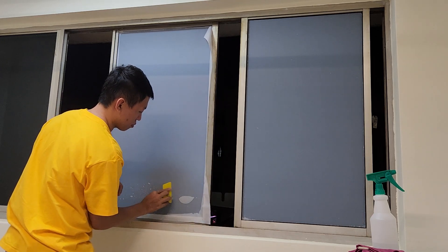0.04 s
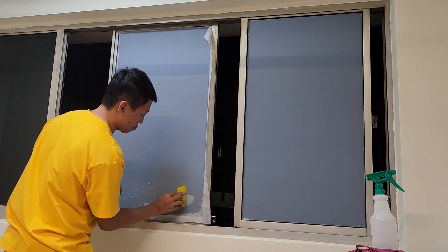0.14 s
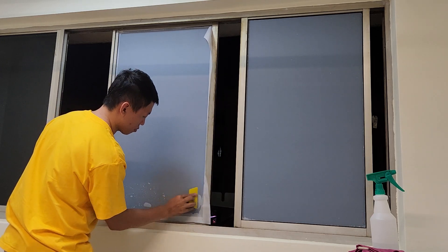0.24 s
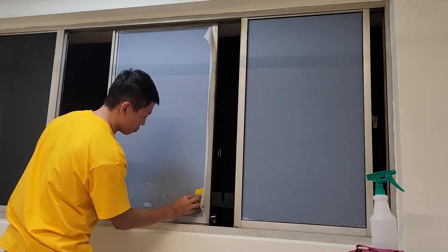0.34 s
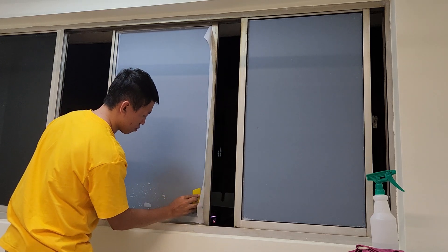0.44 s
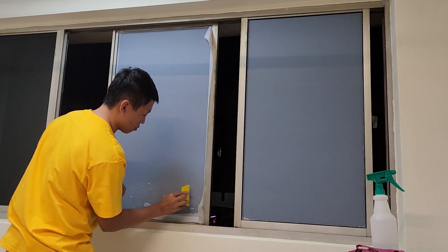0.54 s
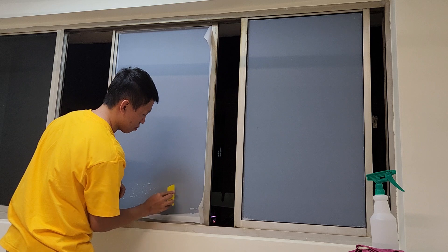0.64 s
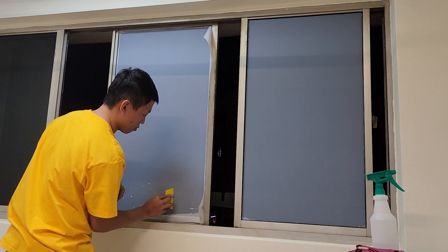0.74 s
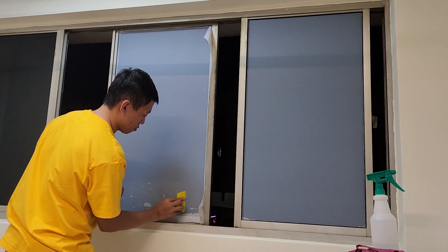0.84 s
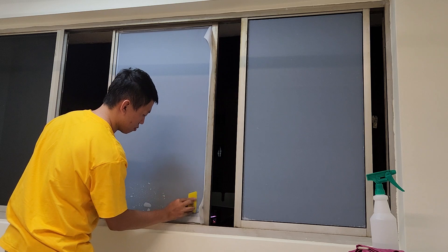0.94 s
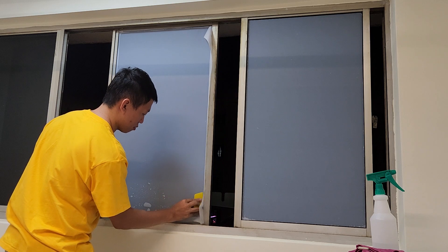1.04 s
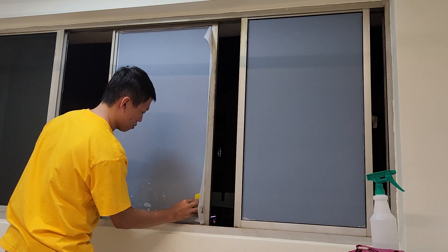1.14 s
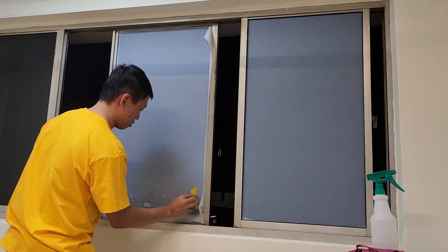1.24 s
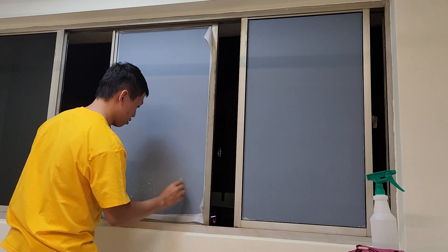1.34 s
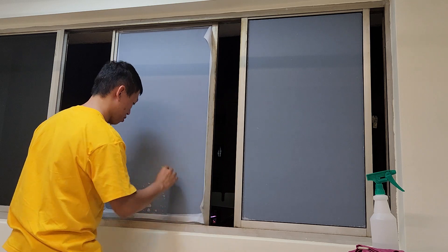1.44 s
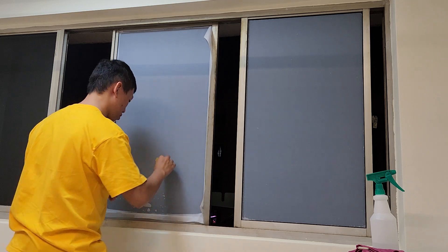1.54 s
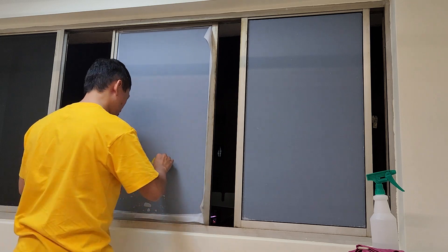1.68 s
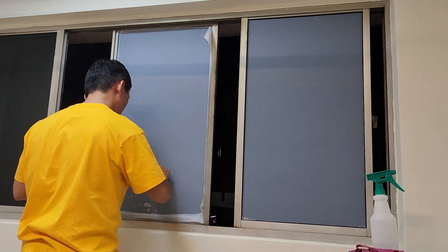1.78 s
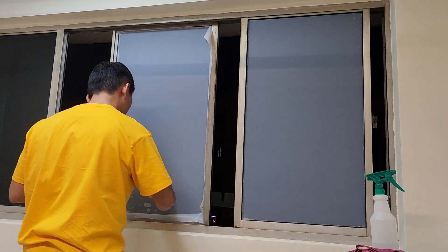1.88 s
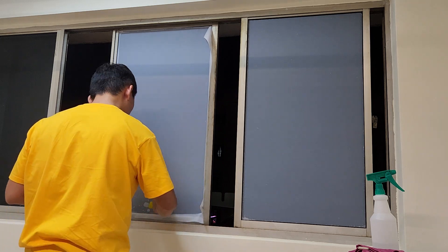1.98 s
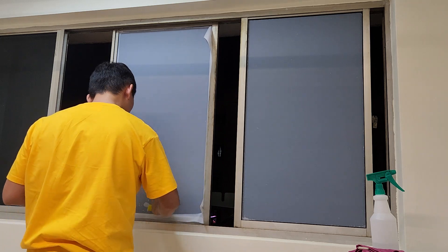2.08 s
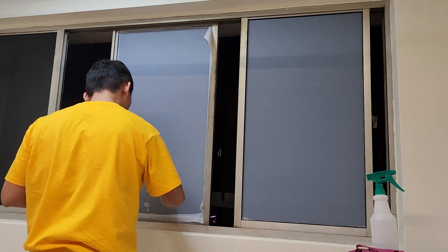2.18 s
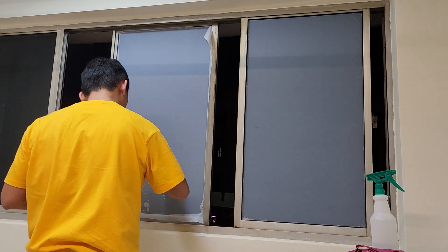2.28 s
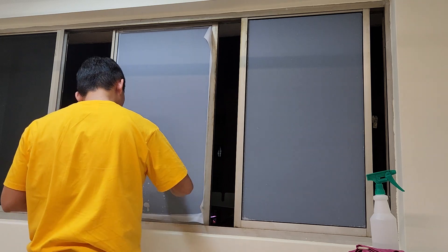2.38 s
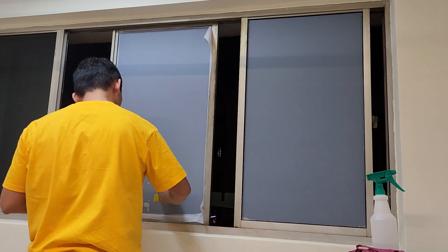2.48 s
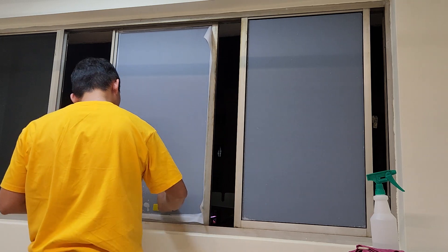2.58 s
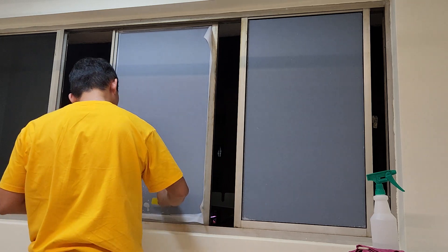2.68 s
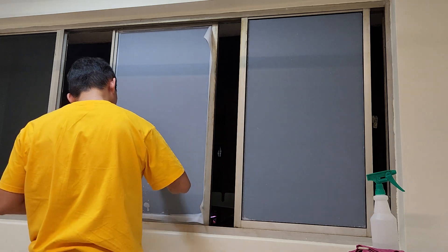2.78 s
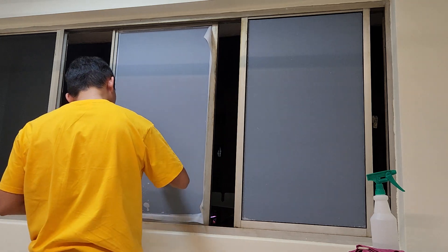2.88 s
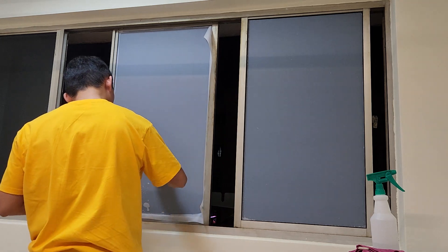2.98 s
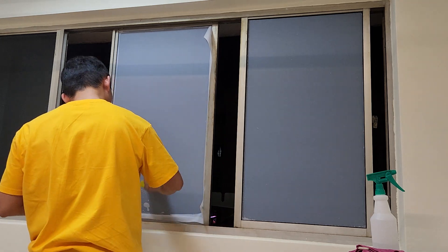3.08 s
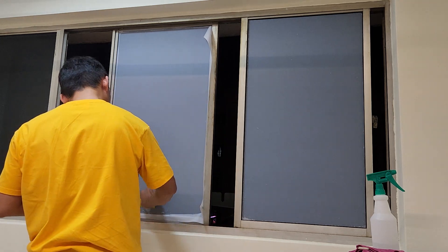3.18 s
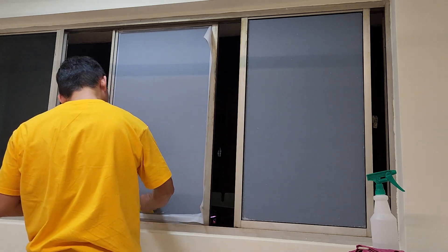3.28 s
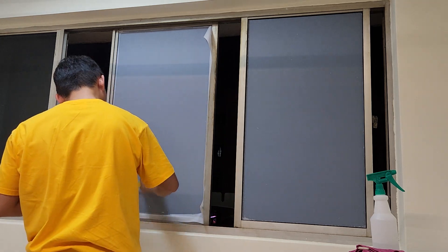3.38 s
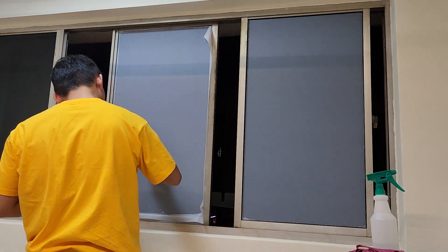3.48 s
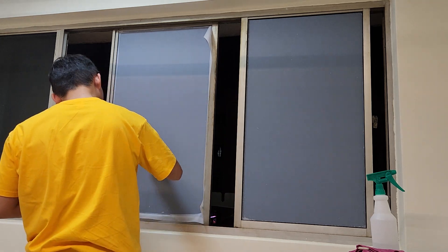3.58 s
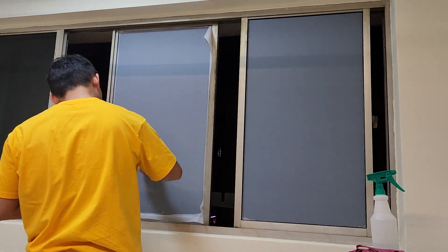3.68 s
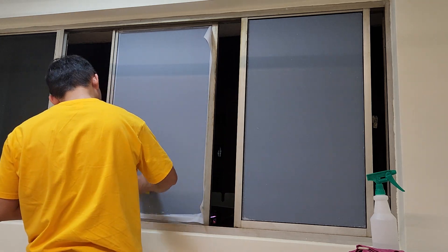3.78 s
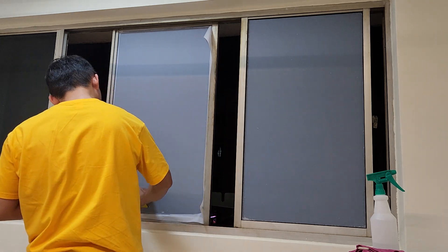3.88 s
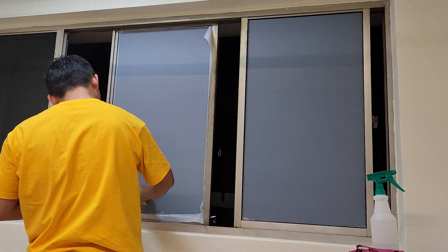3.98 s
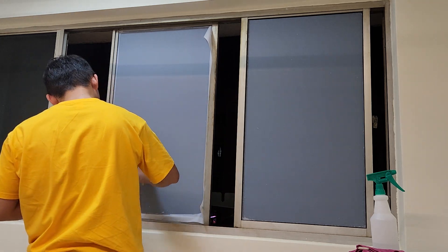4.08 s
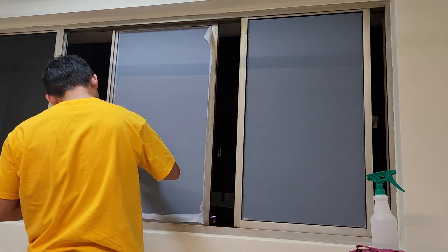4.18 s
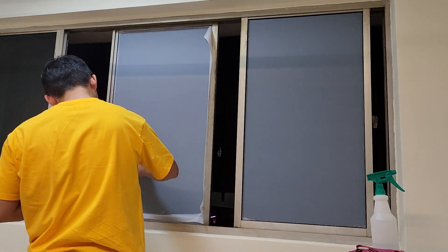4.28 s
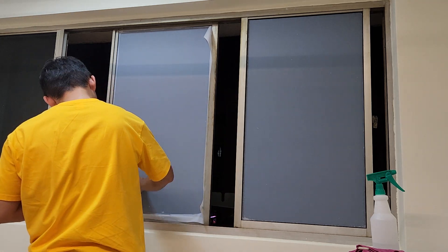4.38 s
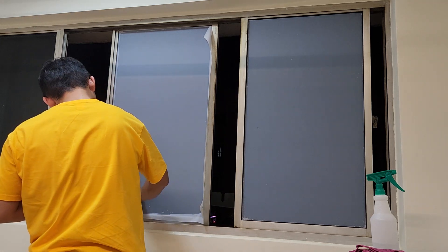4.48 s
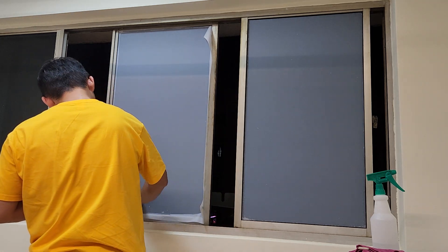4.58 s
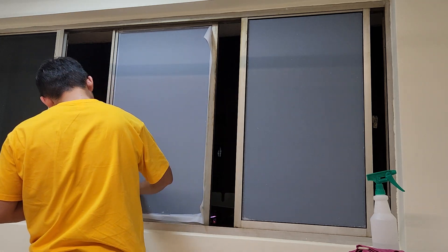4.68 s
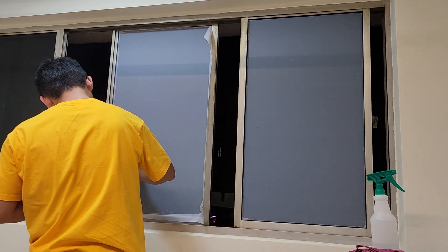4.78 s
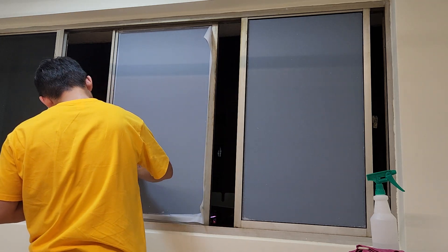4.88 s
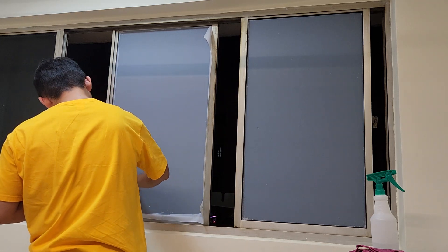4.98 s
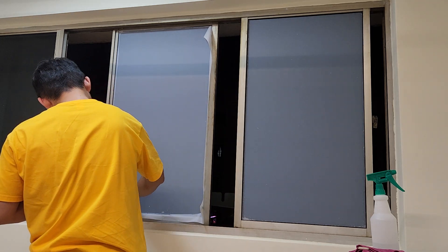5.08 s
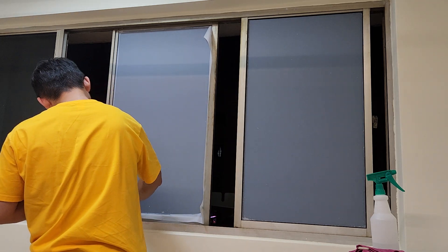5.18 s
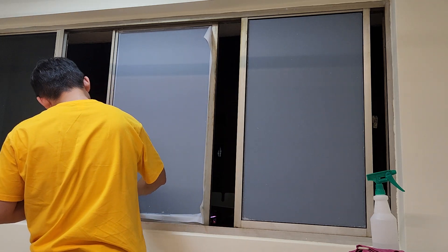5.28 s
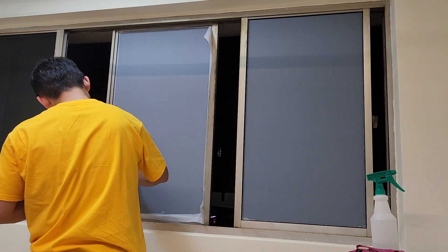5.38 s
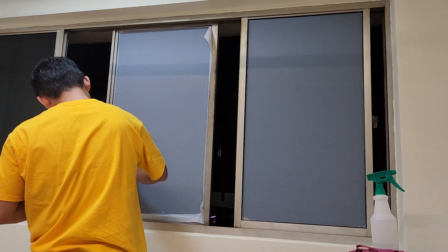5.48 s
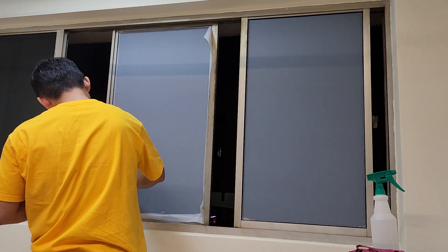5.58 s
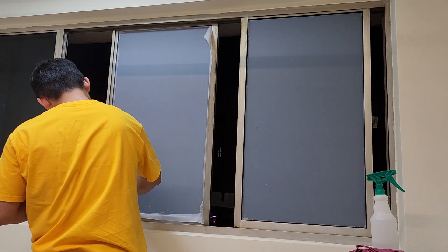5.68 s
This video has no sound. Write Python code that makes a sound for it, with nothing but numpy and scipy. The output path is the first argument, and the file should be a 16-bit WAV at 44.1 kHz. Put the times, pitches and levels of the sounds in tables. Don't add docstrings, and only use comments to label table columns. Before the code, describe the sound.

In a small quiet bare room, a hand tool strokes wet glass: tap, quick swelling hiss with fine spray, hollow plastic ring, fade. Two slow strokes and some light brushes come first, then steadier, lower, more ringing strokes. A frog's rapid sagging croaks come through the open window, mostly in the first half, above a low far-off engine rumble. Close stereo microphone, leaning slightly left.

```python
import sys
import numpy as np
from scipy import signal
from scipy.fft import rfft, irfft, next_fast_len
from scipy.io import wavfile
from scipy.ndimage import map_coordinates

SR = 44100
rng = np.random.default_rng(int(sys.argv[2]) if len(sys.argv) > 2 else 0)


def dump(signal):
    limited = np.clip(np.atleast_2d(signal).T, -1, 1)
    pcm = np.round(limited * 32767).astype(np.int16)
    wavfile.write(sys.argv[1], SR, pcm)


def makeup_ratio(level_db):
    decades = np.asarray(level_db, float) / 20
    return 10 ** decades


N = 252693

# land_s, wait_s, speed_up_s, full_speed_hiss_db, fade_30db_s
STROKE_EVENTS = [
    (-.55, 0.01, 0.19, -39, 0.28),
    (0.093, 0.052, 0.17, -38.5, 0.3859),
    (0.884, 0.0009, 0.13, -39.5, 0.3734),
    (1.819, .055, 0.096, -38.5, 0.35),
    (2.472, 0.0055, .13, -40, 0.3158),
    (3.074, 0.018, 0.15, -37.5, 0.3652),
    (3.689, 0.057, 0.16, -37.5, 0.36),
    (4.375, 0.0011, 0.12, -38, 0.37),
    (5.007, 0.042, 0.092, -39.5, 0.36),
    (5.552, 0.089, 0.11, -43.5, 2.8),
]
# time_s, full_speed_pitch_hz, ring_over_hiss_db, pane_drone_db
HAND_GRIP = [
    (0.3, 2695, 2, -61),
    (1.0, 2697, 1.5, -61),
    (1.95, 2330, 8, -58),
    (2.6, 2225, 6, -60),
    (3.25, 2300, 8.5, -60),
    (3.9, 2320, 8, -59),
    (4.5, 2284, 8, -66),
    (5.15, 2216, 7.5, -67),
]
# time_s, half_length_s, hiss_db, spray_over_hiss_db, ring_over_hiss_db
LIGHT_BRUSHES = [
    (0.62, 0.019, -54, -24, 0),
    (1.366, 0.024, -56, -19, -1),
    (1.589, 0.092, -61.5, -8, -15),
    (1.78, 0.036, -66.5, -15, 11.5),
    (1.85, 0.031, -48, -11, -17),
    (5.575, 0.018, -53.5, -11, 2),
]
# time_s, smack_peak_db, thud_db, skid_db, spray_over_skid_db
LANDINGS = [(0.0922, -47, -57, -58, -22), (0.1052, -26, -43.5, -55, -15), (0.5894, -37, -63, -57.5, -20),
            (0.8826, -42, -50, -50.5, -27.5), (1.3442, -44, -49, -58.5, -20), (1.8211, -24, -44, -73, -9),
            (1.8422, -18, -38.5, -57, -13), (2.4866, -42, -50, -54, -26), (3.077, -28, -48, -51.5, -21),
            (3.692, -16.5, -43, -50, -8.5), (4.382, -36, -56, -52, -17), (5.0074, -41, -44, -59, -49.5),
            (5.5558, -24, -47, -56, -21)]
# frequency_hz, level_db_per_hz
EDGE_SPECTRUM = [(590, -48), (1000, -18), (1140, -14), (1890, -1), (2530, -19.5), (3890, -13.5),
                 (4900, -10.5), (9600, -18), (12500, -18), (16000, -33)]
# pitch_hz, width_hz, level_db
PLATE_SHAPES = [(1854, 1390, 2), (2401, 920, -2.5), (2847, 3030, 5.5)]
# pitch_hz, width_hz, level_db
PANE_MODES = [(696, 390, 8.5), (1190, 790, 12.5)]
# frequency_hz, level_db_per_hz
NIGHT_SPECTRUM = [(12, -46), (20, 1), (130, 0), (198, -8.5), (377, -12.5), (485, -19.5), (678, -16),
                  (976, -17), (1960, -27), (2600, -22), (3630, -33.5), (8890, -44), (10200, -40),
                  (11400, -90), (16000, -78)]
# frequency_hz, correlation
PORT_LIKENESS = [(60, 0.99), (180, 0.97), (550, 0.65), (1650, -0.9), (4970, 0.71), (15000, -0.11)]
# pitch_hz, width_hz, level_db
ENGINE_DRONES = [(83.3, 31.4, -0.5), (150.9, 18.4, -5.5), (356, 72, -13.5)]
# time_s, level_db
PASSING_TRAFFIC = [(0.0, -60), (0.16, -45), (0.49, -57), (0.7, -45), (1.2, -49.5), (1.47, -43),
                   (1.96, -50.5), (3.56, -50), (5.17, -47.5), (5.51, -51), (5.73, -43)]
# frequency_hz, t60_s
ROOM_DECAY = [(500, 0.92), (2000, 0.48), (6000, 0.42), (11000, 0.36), (14000, 0.22)]
# time_s, peak_db
FROG_NOTES = [(0.5897, -38.5), (0.6287, -42), (0.6474, -47), (0.7052, -37), (0.722, -40), (0.742, -37.5),
              (0.8133, -40), (0.871, -42), (1.3347, -40), (1.3724, -38), (1.393, -51), (1.4087, -46),
              (1.443, -48), (1.4566, -38.5), (1.48, -36), (1.5205, -45), (1.6242, -38.5), (2.7736, -40),
              (2.798, -38), (2.824, -43), (2.8477, -39), (2.878, -42), (3.318, -39), (3.3854, -34),
              (3.4166, -35), (3.441, -36), (3.469, -43), (4.2018, -37.5), (4.2174, -51), (4.244, -45)]
# pitch_ratio, level_db
FROG_PARTIALS = [(.76, -18), (0.998, -2), (1.09, -15.5), (1.24, -16)]
# pitch_hz, width_hz, level_db
RASP_MODES = [(1210, 110, 1), (1360, 370, -6)]
PORT_LEAN = np.array([[.9], [-.9]])

RISE_SHAPE, FADE_SHAPE = 1.66, 1.186
SLACK_HZ_PER_DB, SLACK_AFTER = 11.5, 0.35
RING_LEADS, RING_LINGERS = 0.45, 0.12
DRONE_LEADS, DRONE_FOLLOWS = 0.1, 0.32
SPRAY_DB, DRY_AT_DB = -8.5, 29
SKID_SETS_S, SKID_T60_S = 0.0052, 0.51
SKID_RING_DB, SKID_DRONE_DB = 9.5, 5.5
FLAT_RINGS, FLAT_DRONES = 0.28, 0.34
CROAK_HZ, SAG_HZ, NOTE_S, SWELL_S = 1128, 110.2, 0.021, 0.005
MUTTER_DB, MUTTER_S = -10.5, 0.041
NIGHT_DB = -45
TOP_HZ = 15800
LEAD_S = 3 / SR


def unit(x):
    return x / np.sqrt(np.mean(x ** 2) + 1e-20)


def along(points, hz):
    f, v = np.transpose(points)
    return np.interp(np.log(hz + 1), np.log(f + 1), v)


def wobble(rate):
    knots = rng.standard_normal(int(N * rate / SR) + 4)
    return map_coordinates(knots, [np.arange(N) * rate / SR])


def filtered(x, response):
    m = next_fast_len(N + SR // 2)
    return irfft(rfft(x, m) * response(np.fft.rfftfreq(m, 1 / SR)), m)[..., :N]


def resonant(x, modes, order=1):
    def response(f):
        return sum(makeup_ratio(db) * (1j * f * w / (c * c - f * f + 1j * f * w)) ** order for c, w, db in modes)
    return filtered(x, response)


def slips(spiky_db, lumpy_db, shared):
    spikes = np.minimum(rng.exponential(size=(3, N)), 4)
    grains = makeup_ratio(spiky_db * spikes + lumpy_db * wobble(120)) * rng.standard_normal((3, N))
    return grains[:2] + shared * grains[2]


def edge_hiss():
    def response(hz):
        spectrum = makeup_ratio(along(EDGE_SPECTRUM, np.maximum(hz, 3500)))
        return spectrum / (1 + (1700 / (hz + 1)) ** 4) / (1 + (hz / 10500) ** 8)
    return unit(filtered(slips(spiky_db=1, lumpy_db=-0.3, shared=0.32), response))


def film_spray():
    def response(hz):
        return 1 / (1 + (10500 / (hz + 1)) ** 8) / (1 + (hz / 15000) ** 5)
    return unit(filtered(slips(spiky_db=1.5, lumpy_db=1.1, shared=0.18), response))


def plate_ring(pitch):
    bend = np.interp(pitch, [c for c, _, _ in PLATE_SHAPES], np.arange(len(PLATE_SHAPES)))
    ring = 0
    for k, (c, w, db) in enumerate(PLATE_SHAPES):
        share = np.sqrt(np.clip(1 - abs(bend - k), 0, 1))
        grains = slips(spiky_db=2, lumpy_db=1.2, shared=0.75)
        ring = ring + makeup_ratio(db) * share * unit(resonant(grains, [(c, w, 0)], order=2))
    return ring


def pane_drone():
    return unit(resonant(slips(spiky_db=1.5, lumpy_db=-0.5, shared=0.6), PANE_MODES, order=2))


def pane_hum():
    return unit(resonant(slips(spiky_db=0.0, lumpy_db=2.5, shared=0.43), [(1479, 29, 0)]))


def strokes():
    t = np.arange(N) / SR
    land, wait, rise, peak_db, fade = np.transpose(STROKE_EVENTS)[:, :, None]
    after = t - land - wait - rise
    speed = np.sin(np.pi / 2 * np.clip(1 + after / rise, 1e-3, 1))
    rising_db = -20 * RISE_SHAPE * np.log10(speed)
    fading_db = 30 * abs(after / fade) ** FADE_SHAPE
    under_db = np.where(after < 0, rising_db, fading_db)
    now = np.searchsorted(land[:, 0], t) - 1, np.arange(N)
    sweep_db = (peak_db - under_db)[now]
    under_db = np.minimum(under_db[now], 60)
    fading = after[now] > 0

    s, *grip = np.transpose(HAND_GRIP)
    grip_hz, grip_db, pane_db = [np.interp(t, s, c) for c in grip]
    pitch = grip_hz - SLACK_HZ_PER_DB * np.where(fading, SLACK_AFTER, 1) * np.minimum(under_db, 30)

    s, _, _, skid_db, skid_spray_db = np.transpose(LANDINGS)[:, :, None]
    settling = np.clip((t - s) / SKID_SETS_S, 0, 1) ** 2
    skid = settling * makeup_ratio(2 * (skid_db - 60 * abs(t - s) / SKID_T60_S))
    s, half, brush_db, brush_spray_db, brush_ring_db = np.transpose(LIGHT_BRUSHES)[:, :, None]
    brush_db = brush_db - 10 * ((t - s) / half) ** 2
    uneven = makeup_ratio(0.21 * wobble(13))

    def level(sweep_over_db, skid_over_db, brush_over_db):
        sweep_power = makeup_ratio(2 * (sweep_db + sweep_over_db))
        skid_power = np.sum(skid * makeup_ratio(2 * skid_over_db), axis=0)
        brush_power = np.sum(makeup_ratio(2 * (brush_db + brush_over_db)), axis=0)
        return uneven * np.sqrt(sweep_power + skid_power + brush_power)

    spray_db = SPRAY_DB - 15 * fading * (under_db / DRY_AT_DB) ** 2
    ring_db = grip_db + np.where(fading, RING_LINGERS, RING_LEADS) * under_db
    drone_db = pane_db - np.where(fading, DRONE_FOLLOWS, DRONE_LEADS) * under_db - sweep_db
    skid_ring_db = SKID_RING_DB - FLAT_RINGS * (skid_spray_db + 19.5)
    skid_drone_db = SKID_DRONE_DB - FLAT_DRONES * (skid_spray_db + 19)
    return (level(0, 0, 0) * (makeup_ratio(0.5) * edge_hiss() + makeup_ratio(-15.5) * pane_hum())
            + level(spray_db, skid_spray_db, brush_spray_db) * makeup_ratio(2.5) * film_spray()
            + level(ring_db, skid_ring_db, brush_ring_db) * plate_ring(pitch)
            + level(drone_db, skid_drone_db, -3) * pane_drone())


def room(x, quick=1):
    hz, t, z = signal.stft(rng.standard_normal((2, SR)), SR, nperseg=256)
    decay = makeup_ratio(-60 * quick * t / along(ROOM_DECAY, hz)[:, None])
    tail = signal.istft(z * decay, SR, nperseg=256)[1]
    return signal.fftconvolve(x, tail / np.linalg.norm(tail[0]), axes=1)[:, :N]


def traffic():
    passing_db = np.interp(np.arange(N) / SR, *np.transpose(PASSING_TRAFFIC))
    return sum(makeup_ratio(passing_db + db - 3.5) * unit(resonant(rng.standard_normal(N), [(c, w, 0)], order=2))
               for c, w, db in ENGINE_DRONES)


def night():
    def mid_side(hz):
        turn = np.arccos(np.clip(along(PORT_LIKENESS, hz), -1, 1)) / 2
        return makeup_ratio(along(NIGHT_SPECTRUM, hz)) * [np.cos(turn), np.sin(turn)]
    mid, side = filtered(rng.standard_normal((2, N)), mid_side)
    air = unit(np.array([mid + side, mid - side]))
    return makeup_ratio(NIGHT_DB - 2 + 0.14 * wobble(1.9)) * air + traffic()


def taps():
    smack, push = np.zeros((2, N + SR)), np.zeros(N)
    t = np.arange(SR // 10) / SR
    for s, db, thud_db, *_ in LANDINGS:
        start = round(s * SR)
        burst = makeup_ratio(db - 17.0 - 60 * t / 0.045) * rng.standard_normal((2, len(t)))
        smack[:, start:][:, :len(t)] += burst
        push[start] = makeup_ratio(thud_db + 41.5)
    thud = resonant(push, [(510, 370, -3.0), (740, 210, -8.5)], order=2)
    return resonant(smack[:, :N], [(2460, 3100, 0)]) + thud


def frog():
    power, trail, sharp = np.zeros((3, N + SR))
    t = np.arange(SR // 4) / SR
    swell = np.sin(np.pi / 2 * np.minimum(t / SWELL_S, 1)) ** 2
    for s, db in FROG_NOTES:
        start = round((s - SWELL_S / 4) * SR)
        power[start:][:len(t)] += (makeup_ratio(db - 2.5) * swell / (1 + (t / NOTE_S) ** 4)) ** 2
        trail[start:][:len(t)] += (makeup_ratio(db + MUTTER_DB) * swell) ** 2 * np.exp(-t / MUTTER_S)
        sharp[start:][:len(t)] = np.exp(-t / NOTE_S)
    pitch = (CROAK_HZ + SAG_HZ * sharp[:N]) * (1 + 0.01004 * wobble(70))
    phase = 2 * np.pi * np.cumsum(pitch) / SR
    voice = sum(makeup_ratio(db + 1.6 * wobble(60)) * np.sin(ratio * phase) for ratio, db in FROG_PARTIALS)
    rasp = unit(resonant(rng.standard_normal((2, N)), RASP_MODES, order=2))
    croak = np.sqrt(power[:N]) * voice + np.sqrt(trail[:N]) * rasp
    return croak * makeup_ratio([[0.6], [-0.6]])


def scene():
    near = strokes() + taps()
    far = frog()
    yard = makeup_ratio(-11) * room(far, quick=2.5)
    return near + room(makeup_ratio(-3.5) * near) + far + yard + night()


def top_cut(x):
    return signal.sosfilt(signal.butter(12, 16850, fs=SR, output="sos"), x)


def record(dry):
    def ports(hz):
        lead = np.exp(1j * np.pi * hz * LEAD_S * np.array([[1], [-1]]))
        lean = makeup_ratio(PORT_LEAN * along([(130, 0.2), (400, 1), (3000, 1), (6000, 0.81)], hz))
        return lean * lead * (hz < TOP_HZ)
    mix = filtered(dry, ports)
    return top_cut(mix)


dry = scene()
out = record(dry)
dump(out)
```